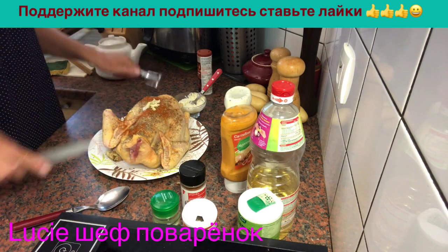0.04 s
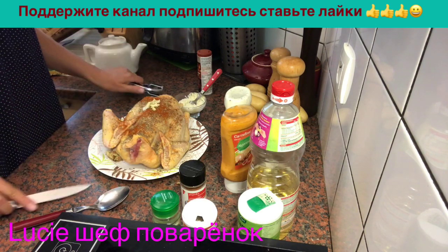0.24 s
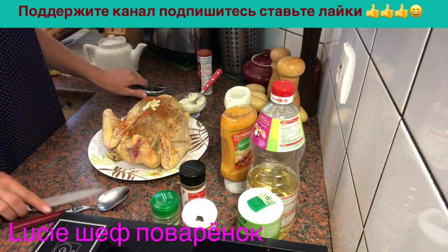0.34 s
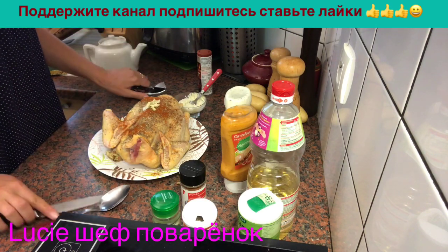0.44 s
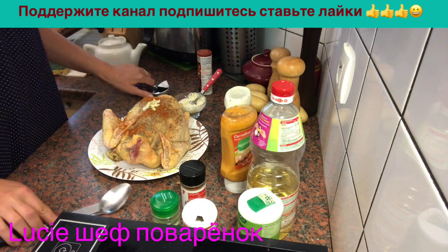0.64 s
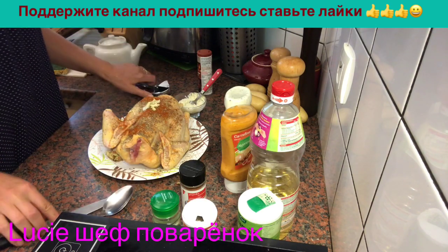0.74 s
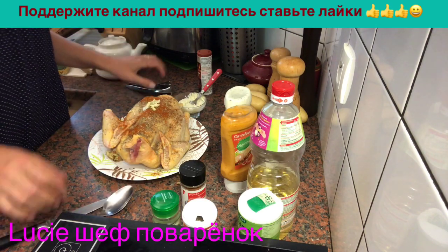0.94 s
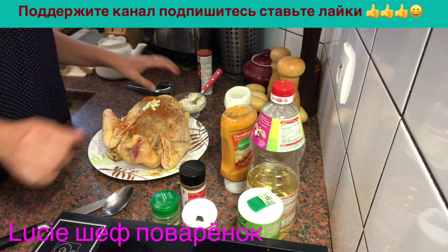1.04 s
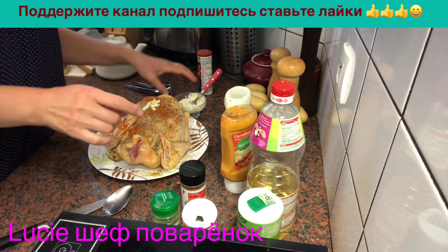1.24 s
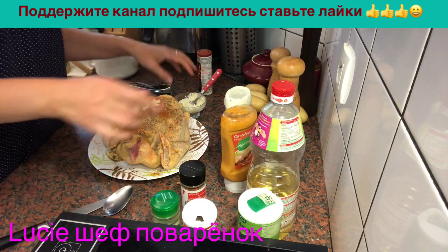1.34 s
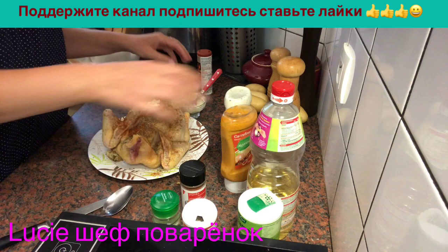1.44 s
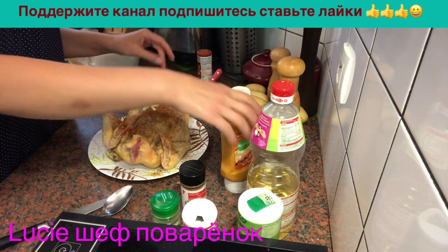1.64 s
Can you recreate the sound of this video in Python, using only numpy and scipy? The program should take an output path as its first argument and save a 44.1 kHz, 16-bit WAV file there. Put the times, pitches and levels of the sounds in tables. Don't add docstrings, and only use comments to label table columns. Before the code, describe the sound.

A metal garlic press clunks and bounces on a stone counter, a knife scrapes and ticks, its blade rings and is quickly damped, the handle rattles and the press rocks to rest; close microphone, small tiled kitchen.

```python
import sys
import numpy as np
from scipy import signal
from scipy.fft import rfft, irfft
from scipy.io import wavfile

SR = 44100
rng = np.random.default_rng(int(sys.argv[2]) if len(sys.argv) > 2 else 0)


def magnitude_from_level(level_db):
    exponent = np.asarray(level_db, float) / 20
    return 10 ** exponent


def output_pcm(signal):
    pcm = np.clip(np.atleast_2d(signal).T, -1, 1) * 32767
    wavfile.write(sys.argv[1], SR, np.round(pcm).astype(np.int16))


N = 74970
TIME_S = np.arange(N) / SR

# start_s, peak_db, edge_db, weight_db (deep part), upper_db (upper modes)
KNOCKS = [(0.038, -85, -44, -17, -5), (0.1931, -47, -66.5, 9, -12), (0.2015, -9, -23.5, 7.5, 0.5),
          (0.2052, -18, -36, 3, 0.5), (0.2457, -17.5, -49, -1, -10), (0.261, -27.5, -47, -2.5, -15),
          (0.269, -31, -44, 12, -2), (0.293, -34, -50, -3, -5), (0.3, -30.5, -44, 9, -7),
          (0.324, -46, -42, 17.5, 8), (0.3429, -21, -27, 4.5, -4), (0.356, -31, -24, -26, -8),
          (0.508, -40, -30, -3, -6), (0.523, -50, -12, -13, 9), (0.6336, -26, -44, 4.5, 7),
          (0.8546, -26, -15.5, 8, -7.5), (0.8636, -23.5, -25, -0.5, 6), (0.896, -24.5, -13.5, -7, 11),
          (1.014, -46, -20, 1, 7)]
# pitch_hz, level_db, t60_s
KNOCK_MODES = [(358.5, -2.5, 0.08), (496.5, -6, 0.043), (808, 7, 0.012), (1159, 6, 0.046),
               (1440, 4.5, 0.018), (2095, -2.5, 0.012), (3300, -10.5, 0.0073), (5370, -7, 0.0051)]
# pitch_hz, level_db, t60_s
COUNTER_MODES = [(700, -6, .15), (845, -4, .15), (930, -4, .15), (1045, -2, .18), (1180, -2, .18),
                 (1400, -2, .12)]
# start_s, peak_db
THUMPS = [
    (0.2021, -27),
    (0.229, -41),
    (0.346, -39),
    (0.637, -42),
    (.68, -41.5),
    (0.722, -55),
    (0.855, -39),
    (0.888, -48),
]

# start_s, peak_db
BLADE_STRIKES = [
    (0.6776, -40.5),
    (0.6796, -41),
    (0.683, -41),
]
# pitch_hz, level_db, t60_s
BLADE_MODES = [(3914, -8, 0.3), (4750, -13, .4), (5303, 0, 0.45), (5900, -3, 0.25), (6142, -6, 0.5),
               (7526, -9, 0.25), (8050, -14, .8), (9970, -7, 0.4), (10340, -10, 0.34), (11410, -3, 0.2),
               (12690, -8, .5), (13310, -3, 0.27), (13900, -9, 0.5), (14630, -10, 0.35)]
# pitch_hz, level_db
BLADE_COLOUR = [(800, 14), (1100, 3), (2200, 6.5), (4300, -23.5), (6300, 10), (9000, -16.5), (13300, 9),
                (16000, -6)]

# start_s, blade_db, drag_db
SLIDE = [
    (.345, -70, -25),
    (.365, -68, -69),
    (.42, -59.5, -63),
    (.437, -59, -46.5),
    (.5, -57.5, -41.5),
    (.525, -75, -44),
    (.555, -59, -49.5),
    (.62, -66.5, -47),
    (.672, -87, -45.5),
]
# pitch_hz, width_hz, level_db
SLIDE_MODES = [(382, 60, 4), (800, 80, -8), (1020, 60, -6), (1450, 60, -6), (5870, 200, -25),
               (6700, 200, -26), (8300, 200, -25), (9400, 150, -27), (10200, 200, -26), (12600, 250, -26),
               (13400, 250, -25), (14500, 200, -26), (15600, 200, -25)]
# pitch_hz, level_db
GRIT_COLOUR = [(120, -42.5), (200, -14.5), (387, -25), (635, 3), (1450, 14), (1740, 10), (16000, -14)]
# start_s, length_s, pitch_hz, level_db
CATCHES = [(0.354, 0.095, 4050, -66.5), (0.367, 0.055, 6050, -59), (0.38, 0.072, 11440, -61),
           (0.363, .06, 13700, -60), (0.396, 0.02, 8000, -64), (0.427, 0.019, 6280, -51.5),
           (0.446, 0.049, 6370, -67), (0.45, 0.053, 4630, -59.5), (0.501, 0.041, 1458, -46.5),
           (0.505, 0.035, 3300, -49), (0.507, 0.03, 4620, -52), (0.576, 0.025, 3520, -54),
           (0.61, 0.01, 2390, -50), (0.878, 0.034, 1463, -25), (1.425, 0.051, 6320, -72)]
# start_s, peak_db, hiss_db
TICKS = [
    (.361, -58, -60),
    (.4311, -67, -59),
    (0.5641, -48, -42),
    (0.575, -54.5, -48),
    (0.59, -71, -55),
    (0.6124, -53, -55),
    (0.6196, -66, -44.5),
    (0.625, -65, -57),
]
# pitch_hz, level_db, t60_s
TIP_MODES = [(5100, -8, .02), (6650, -2, .025), (8100, 0, .025), (9950, -5, .05), (10700, -4, .02),
             (13200, -3, .035), (14800, -2, .02), (15600, -6, .025)]

# start_s, level_db
CHATTER = [
    (.677, -38),
    (.69, -33),
    (.71, -37.5),
    (.73, -43.5),
    (.752, -39),
    (.79, -52),
    (.815, -76),
    (.85, -49.5),
]
# pitch_hz, level_db, t60_s
HANDLE_MODES = [(441, -8, .03), (850, -8, .03), (1020, -1, .035), (1100, -3, .03), (1340, -8, .03),
                (1534, -3, .05), (2060, -7, .04), (2200, -6, .03)]

# start_s, level_db
ROCKING = [(.862, -20), (.878, -30.5), (.887, -25.5), (.9, -25), (.914, -43), (.94, -32.5), (.97, -42),
           (1.0, -46), (1.025, -42), (1.04, -66), (1.06, -61)]
# pitch_hz, level_db, t60_s
PRESS_MODES = [(125, -22, 1.2), (365, -11, .6), (800, -11, .25), (960, -9, .2), (1168, -8, .25),
               (1436, -8, .12), (1620, -10, .15), (1900, -12, .15), (2200, -14, .15)]

# start_s, length_s, level_db
BRUSHES = [
    (0.987, 0.068, -67),
    (1.16, 0.051, -60),
    (1.267, 0.049, -67.5),
    (1.41, 0.0046, -67),
]
# pitch_hz, level_db
BRUSH_COLOUR = [(2350, -37), (4000, 2.5), (5040, -27), (5380, -3.5), (11700, 1.5), (16000, 6)]

# pitch_hz, t60_s
KITCHEN_DECAY = [(100, 0.16), (300, 0.34), (1000, 0.31), (4000, 0.33), (12000, 0.36)]
# pitch_hz, level_db
WALL_COLOUR = [(120, -23), (240, -8), (370, -0.5), (1200, 2), (5000, 6), (16000, -6.5)]

# start_s, hush_db, rumble_db
AIR = [(0, -73.5, -70.5), (.05, -71, -57), (.18, -72.5, -61), (.3, -62.5, -56.5), (1.1, -61, -63),
       (1.21, -65, -64), (1.29, -62, -67.5), (1.35, -64.5, -60), (1.45, -57.5, -64), (1.52, -61, -58.5),
       (1.7, -60.5, -58)]
# pitch_hz, level_db
HUSH_COLOUR = [(240, -43.5), (400, 7), (432, -8), (708, -4), (979, -4), (1070, -1), (2220, 0), (4950, -10),
               (16000, -40.5)]
# pitch_hz, level_db
RUMBLE_COLOUR = [(15, -28.5), (25, 2), (70, -4.5), (107, -1), (253, -3.5), (448, -15.5), (600, -19),
                 (780, -32.5), (1320, -120)]


def rms_one(x):
    return x / np.sqrt(np.mean(x ** 2) + 1e-20)


def low_pass(x, hz, order=2):
    return signal.sosfilt(signal.butter(order, hz, fs=SR, output="sos"), x)


def high_pass(x, hz, order=2):
    return signal.sosfilt(signal.butter(order, hz, "high", fs=SR, output="sos"), x)


def in_time(rows, outside=None):
    s, *columns = np.transpose(rows)
    return [np.interp(TIME_S, s, column, outside, outside) for column in columns]


def swell(start_s, length_s, edge_s):
    to_edge_s = np.minimum(TIME_S - start_s, start_s + length_s - TIME_S)
    return np.clip(to_edge_s / edge_s, 0, 1)


def at_hz(points, hz):
    table_hz, values = np.transpose(points)
    return np.interp(np.log(hz), np.log(table_hz), values)


def colour(x, spectrum):
    hz = np.maximum(np.arange(N // 2 + 1) * SR / N, 1)
    return rms_one(irfft(rfft(x) * magnitude_from_level(at_hz(spectrum, hz)), N))


def drift(rate_hz):
    r = np.exp(-2 * np.pi * rate_hz / SR)
    noise = rng.standard_normal(N + SR)
    return rms_one(signal.lfilter([1], [1, -2 * r, r * r], noise)[SR:])


def clicks_at(s, db):
    clicks = np.zeros(N)
    clicks[(s * SR).astype(int)] = magnitude_from_level(db)
    return clicks


def grains(per_s, size_db):
    happens = rng.random(N) < per_s / SR
    size = magnitude_from_level(size_db * np.minimum(rng.exponential(1, N), 4))
    return happens * size * rng.choice([-1, 1], N)


def ring(clicks, hz, t60_s):
    r = magnitude_from_level(-60 / (max(t60_s, .002) * SR))
    w = 2 * np.pi * hz / SR
    return signal.lfilter([0, np.sin(w)], [1, -2 * r * np.cos(w), r * r], clicks + 1e-18)


def strike(s, db, modes, spread_db):
    out = np.zeros(N)
    luck = rng.standard_normal((len(s), len(modes), 2))[..., 0]
    for k, (hz, level_db, t60_s) in enumerate(modes):
        clicks = clicks_at(s, db + level_db + spread_db * luck[:, k]) * (-1) ** k
        out += ring(clicks, hz, min(t60_s, .6))
    return out


def puff(s, db, t60_s, low_hz):
    shape = signal.lfilter([1], [1, -magnitude_from_level(-60 / (t60_s * SR))], clicks_at(s, db))
    return high_pass(shape * rng.standard_normal(N), low_hz)


def knocks():
    s, db, edge_db, weight_db, upper_db = np.transpose(KNOCKS)
    body_db = db - 7.5
    short = [(hz, level_db, min(t60_s, .03)) for hz, level_db, t60_s in KNOCK_MODES]
    middle = strike(s, body_db, short[2:4], 2.5)
    upper = strike(s, body_db + upper_db, short[4:], 2.5)
    deep = strike(s, body_db + weight_db, KNOCK_MODES[:2], 2)
    edge = puff(s, db + edge_db + 8.5, t60_s=.045, low_hz=730)
    edge = signal.lfilter([.3], [1, -.72], edge)
    counter = strike(s, db - 21, COUNTER_MODES, 1)
    return low_pass(middle + upper + deep + counter, 4020) + edge


def thumps():
    s, db = np.transpose(THUMPS)
    return low_pass(strike(s, db, [(128.5, 0, .19)], 0), 300)


def damping():
    damped_s, db_per_s = .782, 251
    return magnitude_from_level(-db_per_s * np.maximum(TIME_S - damped_s, 0))


def blade():
    s, db = np.transpose(BLADE_STRIKES)
    pitches = np.linspace(44, 125.5, 190) ** 2
    luck = np.clip(rng.standard_normal((190, 3)), -1.5, 1.5)
    crowd = []
    for hz, (detune, louder, longer) in zip(pitches, luck):
        level_db = at_hz(BLADE_COLOUR, hz) - 17 + 3.86 * louder
        crowd.append((hz * (1 + .0041 * detune), level_db, .12 * np.exp(.22 * longer)))
    ringing = strike(s, db, crowd, 6) * damping()
    return ringing + puff(s[:2], db[:2] + 16.5, t60_s=.031, low_hz=1660)


def blade_ring():
    s = np.array(BLADE_STRIKES)[1:2, 0]
    twin_hz, twin_db = 27, -14
    out = 0
    for hz, level_db, t60_s in BLADE_MODES:
        pair = [(hz, level_db, t60_s), (hz + twin_hz, level_db + twin_db, t60_s)]
        out = out + magnitude_from_level(1.5 * drift(30)) * strike(s, -36, pair, 0)
    return damping() * out


def slide():
    blade_db, drag_db = in_time(SLIDE, outside=-140)
    grit_per_s, split_hz = 5200, 3260
    blade_tones, drag_tones = 0, 0
    for hz, width_hz, db in SLIDE_MODES:
        level = magnitude_from_level(db + 5 * drift(15.8))
        tone = level * rms_one(ring(grains(grit_per_s, 6.3), hz, 2.33 / width_hz))
        if hz < split_hz:
            drag_tones = drag_tones + tone
        else:
            blade_tones = blade_tones + tone
    grit = colour(grains(grit_per_s * 4, 4.2), GRIT_COLOUR) * magnitude_from_level(7 * drift(46))
    bright = magnitude_from_level(1) * rms_one(high_pass(grit, split_hz, 4)) + rms_one(blade_tones)
    dull = magnitude_from_level(-4) * rms_one(low_pass(grit, split_hz, 4)) + rms_one(drag_tones)
    return magnitude_from_level(blade_db) * bright + magnitude_from_level(drag_db) * dull


def catches():
    out = 0
    for s, length_s, hz, db in CATCHES:
        tone = rms_one(ring(grains(5000, 3), hz, .025))
        out = out + magnitude_from_level(db) * swell(s, length_s, .27 * length_s) * tone
    return out


def ticks():
    s, db, hiss_db = np.transpose(TICKS)
    return strike(s, db, TIP_MODES, 8.5) + puff(s, hiss_db, t60_s=.038, low_hz=5000)


def chatter():
    level_db, = in_time(CHATTER, outside=-140)
    tones = sum(magnitude_from_level(db) * rms_one(ring(grains(900, 8.1), hz, t60_s)) for hz, db, t60_s in HANDLE_MODES)
    return magnitude_from_level(level_db) * rms_one(tones)


def rocking():
    level_db, = in_time(ROCKING, outside=-140)
    clicks = grains(1200, 2.5)
    tones = 0
    for hz, db, t60_s in PRESS_MODES:
        uneven = clicks * magnitude_from_level(3 * rng.standard_normal(N))
        tones = tones + magnitude_from_level(db) * ring(uneven, hz, .11 * t60_s)
    edge = rms_one(ring(clicks, 2360, .001) + .15 * ring(clicks, 5300, .0014))
    return magnitude_from_level(level_db - 5.5) * low_pass(rms_one(tones) + magnitude_from_level(-6) * edge, 5830)


def brushes():
    edge_s = .014
    shape = sum(magnitude_from_level(db) * swell(s, length_s + edge_s, edge_s) for s, length_s, db in BRUSHES)
    return shape * magnitude_from_level(1.8 * drift(55)) * colour(rng.standard_normal(N), BRUSH_COLOUR)


def kitchen(x):
    t = np.arange(SR // 2) / SR
    edges = 60 * 2 ** np.arange(0, 8.2, 1 / 3)
    tail = 0
    for low, high in zip(edges, edges[1:]):
        third = signal.butter(2, [low, high], "band", fs=SR, output="sos")
        band = signal.sosfilt(third, rng.standard_normal(len(t)))
        level_db = at_hz(WALL_COLOUR, np.sqrt(low * high))
        tail = tail + band * magnitude_from_level(level_db - 60 * t / at_hz(KITCHEN_DECAY, low))
    tail = tail * (t > .0051)
    return signal.fftconvolve(x, tail / np.sqrt(np.sum(tail ** 2)))[:N]


def air():
    hush_db, rumble_db = in_time(AIR)
    hush = magnitude_from_level(hush_db + .9 * drift(4.1)) * colour(rng.standard_normal(N), HUSH_COLOUR)
    rumble = magnitude_from_level(rumble_db + .83 * drift(22)) * colour(rng.standard_normal(N), RUMBLE_COLOUR)
    return hush + rumble


def scene():
    near = knocks() + blade() + slide() + rocking() + brushes() + chatter() + thumps() + ticks()
    clear = blade_ring() + catches()
    room = magnitude_from_level(-5.5) * kitchen(near + magnitude_from_level(-12) * clear)
    dip = signal.iirnotch(250, 5, fs=SR)
    heard = high_pass(signal.lfilter(*dip, near + clear + room), 100, 4)
    floor = high_pass(air(), 45, 4)
    mic_hiss = magnitude_from_level(-75.5) * rng.standard_normal(N)
    return (heard + floor + mic_hiss)[None]


def top_cut(x):
    return signal.sosfilt(signal.butter(12, 16720, fs=SR, output="sos"), x)


def record(dry):
    top = .8
    rounded = top * np.tanh(dry / top)
    mix = signal.sosfilt(signal.cheby2(16, 32, 16050, fs=SR, output="sos"), rounded)
    return top_cut(mix)


dry = scene()
out = record(dry)
output_pcm(out)
```